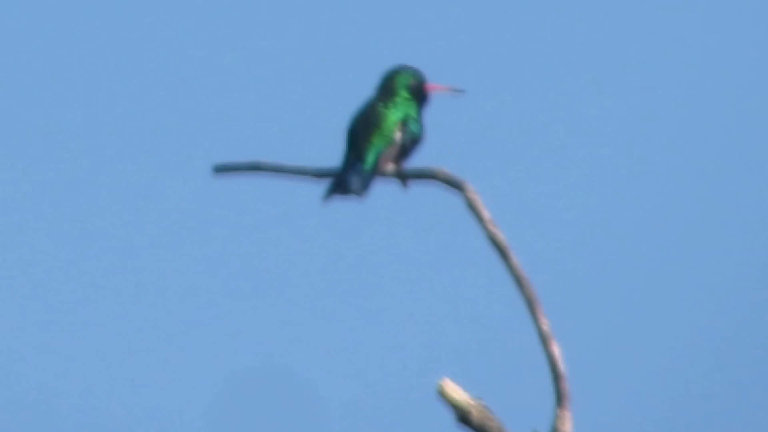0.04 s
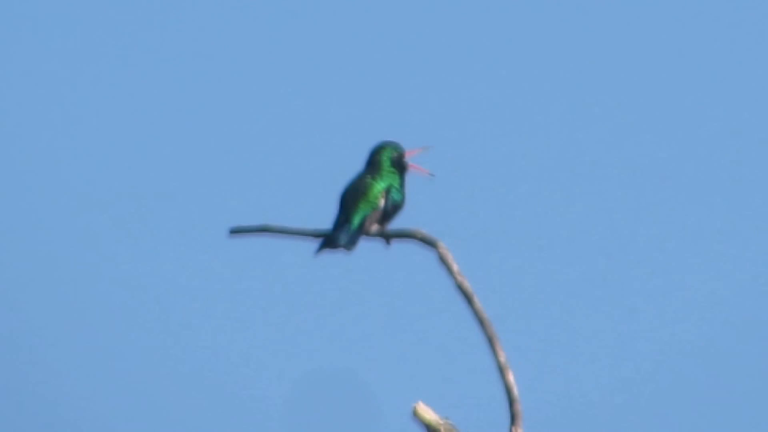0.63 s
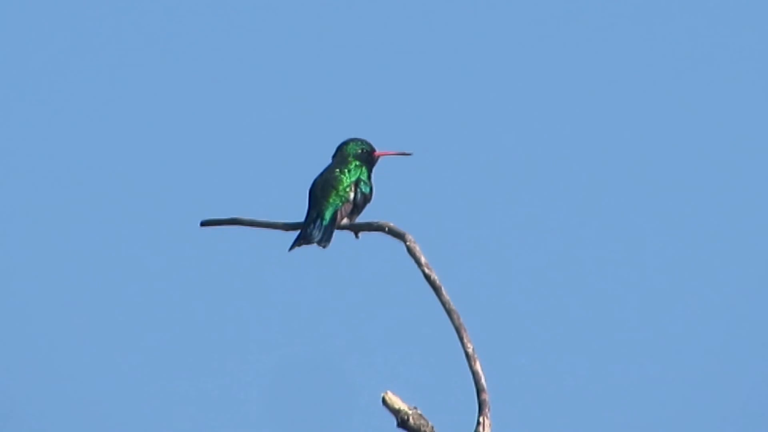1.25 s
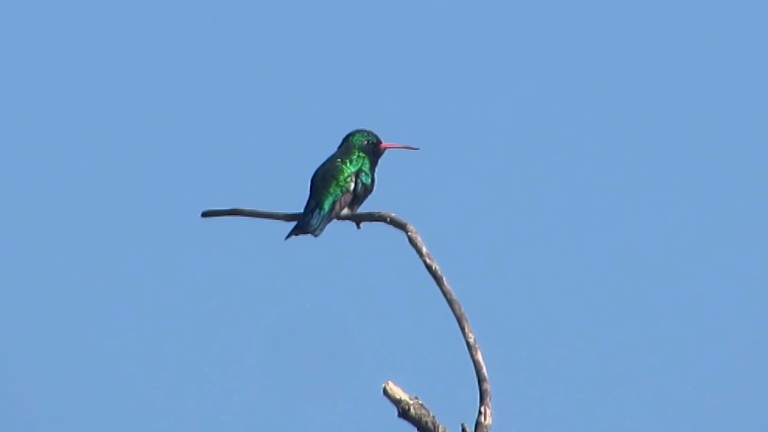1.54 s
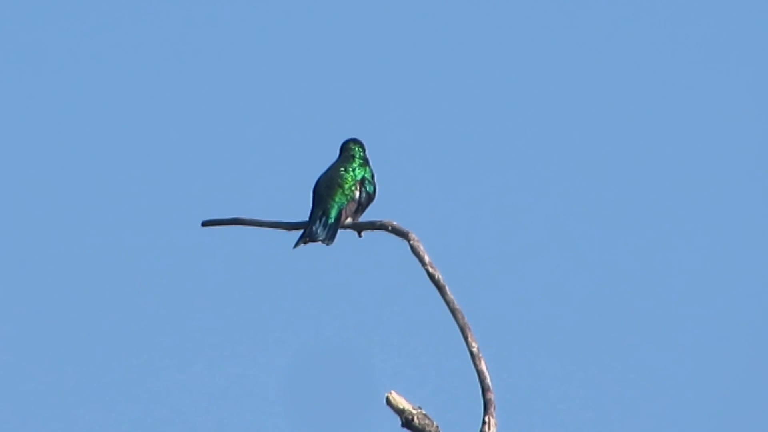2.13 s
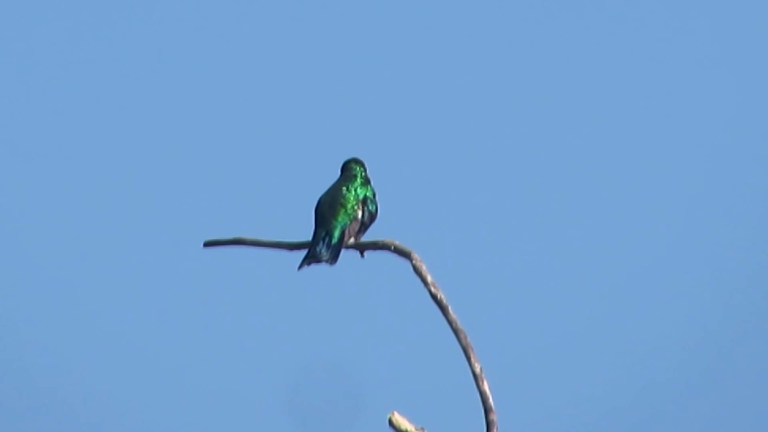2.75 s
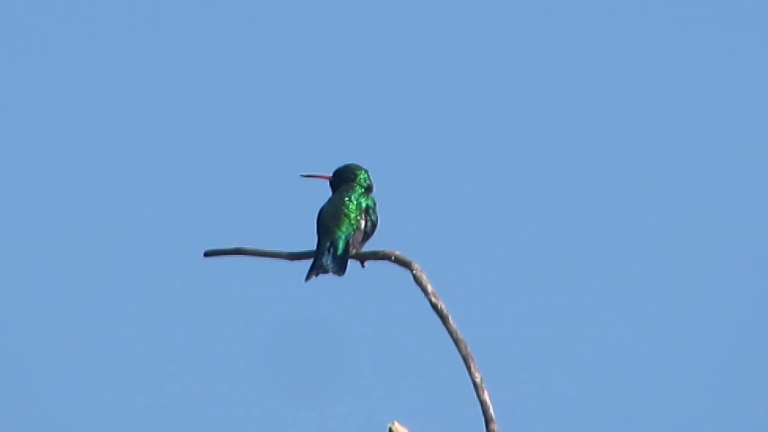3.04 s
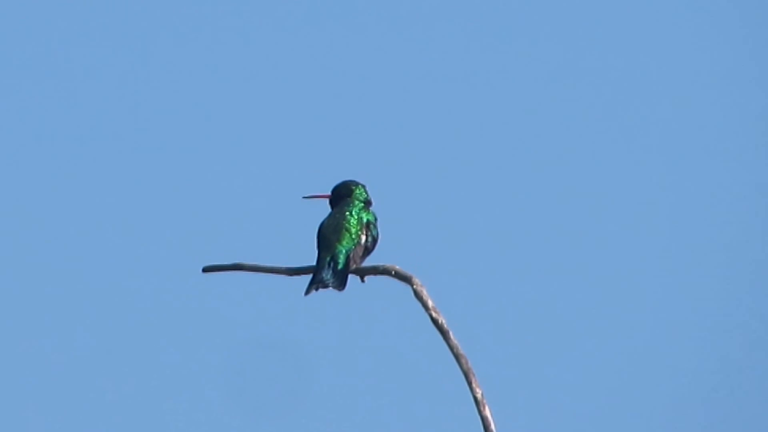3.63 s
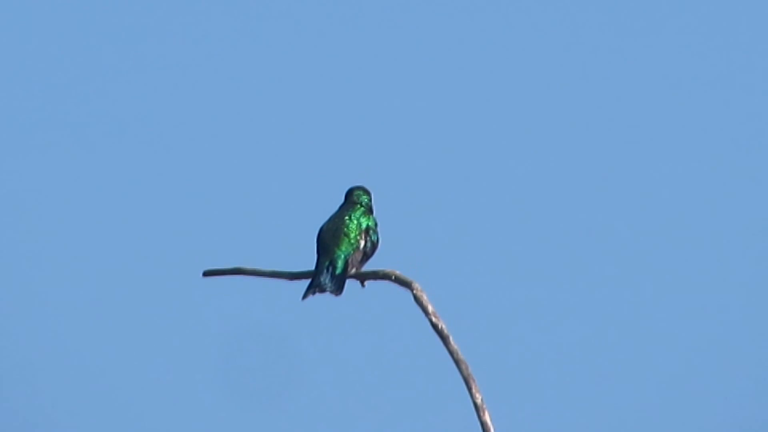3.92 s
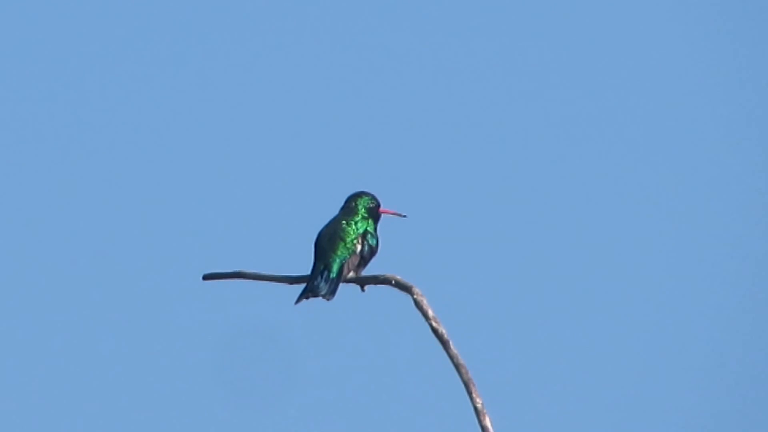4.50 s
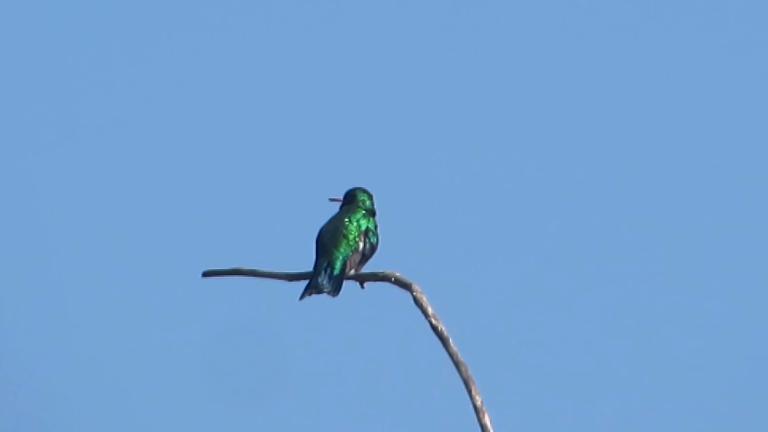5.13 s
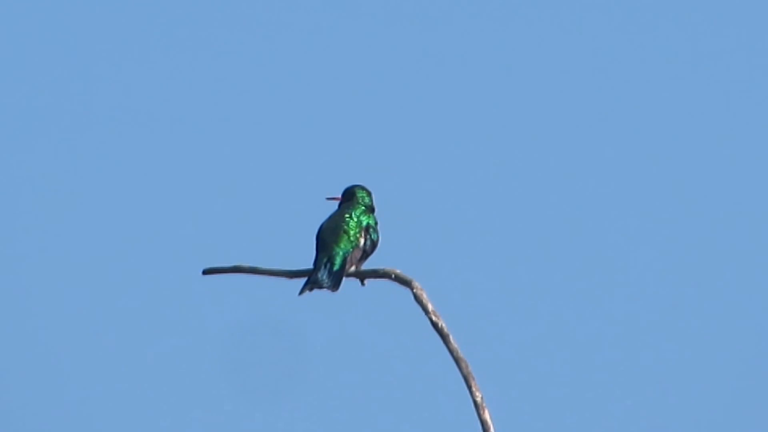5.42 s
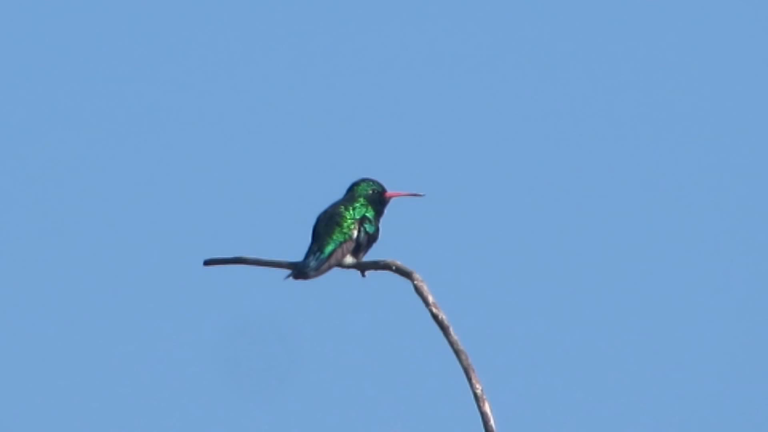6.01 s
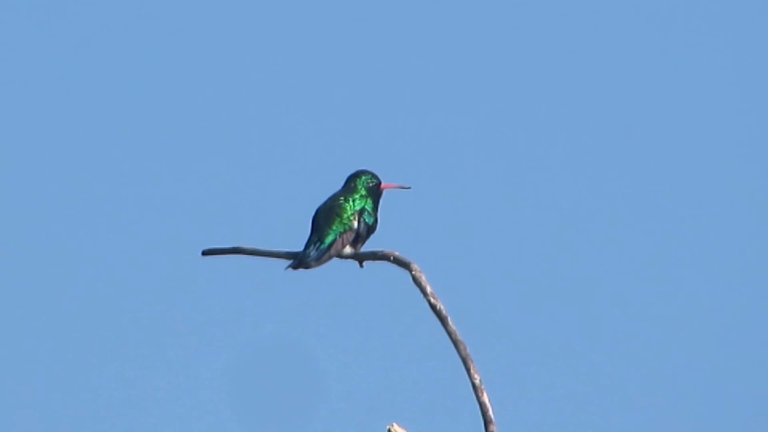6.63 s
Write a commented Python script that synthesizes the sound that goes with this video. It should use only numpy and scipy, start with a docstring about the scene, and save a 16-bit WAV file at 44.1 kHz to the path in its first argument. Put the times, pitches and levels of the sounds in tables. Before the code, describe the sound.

A close cricket chirps in quick runs while small birds slur, chatter and trill over distant insects, frogs and a light breeze.

```python
"""A breeze buffets a hand-held camera's microphone and a switch clicks on its case; then a near cricket
scrapes its wings in quick pairs of strokes. Open country by day: more crickets and far-off frogs
merge into choruses behind it. Off to the right, small birds slur, whistle and chatter, scattered
by leaves and trunks, and a dry trill swells in the second half. The hand bumps the case softly."""
import sys
import numpy as np
from scipy import signal
from scipy.fft import rfft, irfft
from scipy.io import wavfile

SR = 44100
rng = np.random.default_rng(int(sys.argv[2]) if len(sys.argv) > 2 else 0)


def generate_wav(sig):
    """Save sig (samples, or channels by samples) to the path in sys.argv[1] as 16-bit PCM at SR."""
    pcm = np.round(np.clip(np.atleast_2d(sig).T, -1, 1) * 32767).astype(np.int16)
    wavfile.write(sys.argv[1], SR, pcm)


N = 298116
T = np.arange(N) / SR
HZ = np.fft.rfftfreq(N, 1 / SR)


def amp(db):
    """Decibels to gain."""
    return 10 ** (np.asarray(db) / 20)


def unit_rms(x):
    """Scales to unit rms."""
    return x / np.sqrt(np.mean(x ** 2) + 1e-20)


def over_frequency(points):
    """The columns of a table, interpolated along the log-frequency axis."""
    hz, *columns = np.transpose(points)
    return [np.interp(np.log(HZ + 1), np.log(hz), column) for column in columns]


def add(mix, start_s, sound):
    """Mixes a sound in at its start time."""
    part = mix[max(round(start_s * SR), 0):][:len(sound)]
    part += sound[:len(part)]


def drift(rate_hz):
    """A smooth random wander of unit rms, mostly slower than rate_hz."""
    hz = HZ[:N // 16]
    real, imag = rng.standard_normal((2, len(hz)))
    return unit_rms(irfft((real + 1j * imag) * np.exp(-(hz / rate_hz) ** 2), N))


def pan(pan_db):
    """Left and right gains for a level difference, left minus right."""
    half_db = np.atleast_1d(pan_db) / 2
    return np.array([amp(half_db), amp(-half_db)])


def noise(density_db, correlation, pan_db):
    """Two partly alike channels of noise with a given power per Hz."""
    left, unrelated = rfft(rng.standard_normal((2, N)))
    right = correlation * left + np.sqrt(1 - correlation ** 2) * unrelated
    return irfft(np.array([left, right]) * pan(pan_db) * amp(density_db) * np.sqrt(SR / 2), N)


def resonance(hz, width_hz):
    """Frequency response of one resonance, gain 1 at its top."""
    return 1j * HZ * width_hz / (hz ** 2 - HZ ** 2 + 1j * HZ * width_hz)


def tone(hz):
    """A sine of unit rms that follows a pitch curve."""
    return np.sqrt(2) * np.sin(2 * np.pi * np.cumsum(hz) / SR)


def glide(length_s, start, middle, end, flatness=2):
    """A smooth pitch curve through three pitches."""
    u = np.linspace(-1, 1, round(length_s * SR))
    return middle + (end - start) / 2 * u + ((start + end) / 2 - middle) * abs(u) ** flatness


def sing(notes, waver, overtone_db, fade_db):
    """Nearly pure bird notes (start s, pitch curve, dB) that grow unsteady; a negative fade swells."""
    out, wobble = np.zeros(N), waver * drift(410)
    for s, pitch, db in notes:
        u = np.linspace(0, 1, len(pitch))
        hz = pitch * (1 + 2 * u * wobble.take(round(s * SR) + np.arange(len(u)), mode="wrap"))
        envelope = amp(db - fade_db * u) * np.sin(np.pi * u).clip(0) ** .5
        add(out, s, envelope * (tone(hz) + amp(overtone_db) * tone(2 * hz)))
    return out


def outdoors(call, pan_db, wet_db, t60):
    """Places a caller; leaves and trunks scatter a short tail after it."""
    t = T[:SR // 2]
    tail = rng.standard_normal((2, len(t))) * amp(-60 * t / t60) * (1 - np.exp(-t / .001))
    mid, side = signal.fftconvolve(call[None], tail / np.linalg.norm(tail[0]), axes=1)[:, :N]
    echo = 1.11 * mid + .5 * side * np.array([[1], [-1]])  # the close ports hear much the same
    return pan(pan_db) * (call + amp(wet_db) * echo)


def from_right(sound, lag_s=.00003):
    """Sound from the right reaches the microphone's left port a little later."""
    left, right = sound
    return np.array([irfft(rfft(left) * np.exp(-2j * np.pi * HZ * lag_s), N), right])


def still_air():
    """The distant wash of open country and the microphone's hiss, flickering slightly."""
    # Its spectrum. Each row: frequency in Hz, density in dB per Hz.
    spectrum = [(20, -67.5), (80, -64), (150, -71.5), (300, -77.5), (480, -78.5), (720, -77), (1000, -81),
                (1400, -87), (2000, -92.5), (3300, -91.5), (6400, -101), (7600, -100), (8600, -106),
                (12800, -111), (14800, -120)]
    # Its stereo spread. Each row: frequency in Hz, left-right correlation, left minus right in dB.
    spread = [(97.5, 0.4, -6), (250, -0.22, -2), (480, 0.11, 2.5), (1180, 0.41, 0.5), (3000, 0.084, -1.5),
              (6500, 0.032, 1), (7400, -0.33, 0), (14000, 0.59, 1)]
    return noise(over_frequency(spectrum)[0], *over_frequency(spread)) * amp(.86 * drift(23))


def far_band(hz, width_hz):
    """Many far calls merge into one narrow, surging band."""
    band_db = 40 * np.log10(abs(resonance(hz, 2 * width_hz)) + 1e-9)
    return unit_rms(noise(band_db, correlation=.84, pan_db=1.5) * amp(2.2 * drift(5.1)))


def frogs():
    """Far off, two lasting bands of frog chorus and a lower one in bouts."""
    # The lasting bands. Each row: centre in Hz, width in Hz, level in dB.
    bands = [(857.8, 32.7, -48.5), (592.6, 8.8, -61.5)]
    # Bouts of the low call. Each row: start and end in seconds, level in dB.
    low_calls = [(0.598, 1.946, -51.5), (3.23, 3.785, -51.5), (4.475, 5.08, -52.5), (5.684, 6.354, -55)]
    chorus = sum(amp(db) * far_band(hz, width) for hz, width, db in bands)
    bouts = sum(amp(db) * np.clip(np.minimum(T - start, end - T) / .1, 0, 1)
                for start, end, db in low_calls)
    return chorus + bouts * far_band(hz=430, width_hz=67)


def bush_cricket(hz=12600, width_hz=1700):
    """A faint, high sizzle that comes in late."""
    # Its swell. Each row: time in seconds, level in dB.
    swell = [(4.8, -100), (5.3, -74), (6.2, -75), (6.76, -73.5)]
    band = noise(-8 * ((HZ - hz) / width_hz) ** 2, correlation=.2, pan_db=-2)
    return unit_rms(band) * amp(np.interp(T, *np.transpose(swell)) + 1.5 * drift(120))


def twitter(faintest_db=-71, count=240):
    """Faint squeaks of far birds at random moments."""
    when, pitch, tilt, size = rng.random((count, 4)).T
    hz, slope = 2400 + 1200 * pitch, .302 * tilt - .2
    glides = map(glide, .00957 + .0223 * size, hz * (1 - slope), hz, hz * (1 + slope))
    notes = zip(when * T[-1], glides, faintest_db + 6 * size)
    voice = sing(notes, waver=.02, overtone_db=-36, fade_db=3.5)
    return outdoors(voice, pan_db=-6, wet_db=4, t60=.12)


def far_crickets():
    """Two farther crickets throb out of step in front of a blurred chorus."""
    # Their arched chirps. Each row: top pitch in Hz, arch depth in Hz, length in seconds, level in dB.
    chirps = [(4813, 353, 0.057, -47.5), (4523, 200, .030, -58.5)]
    # Their beats. Each row: middle of the first chirp and period, both in seconds.
    beats = [(.073, .0838), (.110, .0571)]
    # The chorus. Each row: frequency in Hz, density in dB per Hz.
    spectrum = [(3900, -115), (4200, -94), (4400, -80.5), (4550, -78.5), (4750, -80), (4950, -82),
                (5150, -86.5), (5400, -105), (5800, -97), (6400, -115)]
    out, wobble = np.zeros(N), 1 + .0025 * drift(160)
    for (hz, arch_hz, length, db), (first, period) in zip(chirps, beats):
        u = np.linspace(-1, 1, round(length * SR))
        for s in np.arange(first, T[-1], period):
            size, late = rng.standard_normal(2)
            pitch = (hz - arch_hz * u ** 2) * wobble.take(round(s * SR) + np.arange(len(u)), mode="wrap")
            chirp = amp(db + .85 * size) * tone(pitch) * np.sqrt(1 - u ** 2)
            add(out, s - length / 2 + .003 * late, chirp)
    chorus = noise(over_frequency(spectrum)[0], correlation=.92, pan_db=-3.5) * amp(2 * drift(48))
    return outdoors(out, pan_db=-4.5, wet_db=-14, t60=.15) + chorus


def breeze(buffet_s=.025, turbulence_db=3.5, turbulence_hz=17.5):
    """Turbulent wind pushes the microphone's two ports in opposite directions."""
    # The rumble before the gains below. Each row: frequency in Hz, density in dB per Hz.
    spectrum = [(10, -97), (30, -63), (48, -53.5), (85, -61), (140, -67.5), (220, -79.5), (450, -100),
                (1200, -140)]
    # Spells of breeze. Each row: time in seconds, gain in dB.
    spells = [(0, 2.5), (.2, 0), (.33, -12), (1.4, -9.5), (1.6, 0.5), (2.25, 9), (2.6, 5.5), (3.0, -15),
              (3.4, -17), (3.6, -4), (5.55, -20), (5.72, -2.5), (6.4, 0.5), (6.75, -11)]
    # Single buffets that stand out of it. Each row: time of the peak in seconds, gain in dB.
    buffets = [(.05, 12.5), (.16, 8.5), (.79, 12.5), (1.6, 11.5), (1.97, 10), (5.71, 11), (6.39, 12)]
    strength = amp(np.interp(T, *np.transpose(spells)) + turbulence_db * drift(turbulence_hz))
    gusts = sum(amp(db) * np.exp(-((T - s) / buffet_s) ** 2) for s, db in buffets)
    rumble = noise(over_frequency(spectrum)[0], correlation=-.93, pan_db=-5.4)
    return rumble * np.hypot(strength, gusts)


def handling(scrape_db=-21, bump_rise_s=.00077):
    """Right at the microphone, the hand bumps the case and a switch rings it with snaps and scrapes."""
    # Soft bumps. Each row: start in seconds, level in dB, ring in Hz.
    touches = [(1.45, -25, 265), (1.984, -31, 220), (2.233, -29.5, 232), (2.408, -28, 218),
               (2.812, -30, 280), (3.31, -27.5, 273), (3.535, -27, 250), (3.631, -31, 220),
               (3.772, -32, 217), (3.878, -27.5, 230), (5.498, -26.5, 230), (5.758, -24.5, 257)]
    # The switch slides and snaps. Each row: start in seconds, level in dB, scrape decay in seconds.
    snaps = [(0.172, -33, 0.0022), (0.182, -29, 0.0062), (.189, -29, 0.013), (0.2012, -17.5, 0.00048),
             (0.2036, -29.5, 0.01), (.209, -28, 0.0025)]
    # Resonances of the case. Each row: centre in Hz, width in Hz, relative level in dB.
    modes = [(840, 340, 3.5), (1340, 310, 1), (1740, 37, 12), (2350, 170, -31)]
    bumps, clicks, t = np.zeros(N), np.zeros(N), T[:SR // 16]
    rise = t / bump_rise_s
    for s, db, hz in touches:
        add(bumps, s, amp(db) * rise * np.exp(1 - rise) * np.cos(2 * np.pi * hz * t))
    for s, db, decay in snaps:
        scrape = amp(scrape_db) * rng.standard_normal(len(t)) * np.exp(-t / decay)
        add(clicks, s, amp(db) * ((t == 0) + scrape))
    ring = sum(amp(db) * resonance(hz, width) for hz, width, db in modes)
    case = unit_rms(ring / (1 + 1j * HZ / 6000))
    return pan(9.8) * bumps + pan(6.8) * irfft(rfft(clicks) * case, N)


def whistles():
    """A farther bird's thin, steady arches."""
    # Each row: start and length in seconds, first, middle and last pitch in Hz,
    # flatness of the top (2 is round), level in dB.
    arches = [(0.156, .14, 3680, 3620, 2950, 1.7, -58), (.625, 0.087, 3250, 3370, 3080, 2.4, -59.5),
              (1.223, .118, 3470, 3610, 3230, 2.03, -52.5), (4.138, .135, 3000, 3920, 3000, 3.7, -49)]
    notes = [(s, glide(*shape), db) for s, *shape, db in arches]
    voice = sing(notes, waver=.003, overtone_db=-37, fade_db=-3.5)
    return outdoors(voice, pan_db=-7, wet_db=-7.5, t60=.14)


def chatter(length_s=.16, hold_s=.028, hold_hz=1190, swell_db=3, fade_db=3, rasp_db=-36):
    """A bird holds a low note, then flicks up and down; its throat picks out harmonics, and it rasps."""
    # Each row: start in seconds, level in dB, pitch factor, throat resonance and its width in Hz.
    calls = [(0.409, -48, 0.98, 2950, 2400), (1.951, -57.5, 0.98, 3000, 2300),
             (2.320, -59.5, 0.89, 2730, 2300), (2.713, -38.5, 0.97, 3440, 2740),
             (3.558, -45.5, 0.93, 2790, 2680), (4.104, -60, 0.9, 2430, 2300)]
    flick_s, low_hz, high_hz = .0187, 1600, 2583  # all pitches are before each call's factor
    lean = .55  # makes the rise quicker than the slide back
    out, t = np.zeros(N), T[:round(length_s * SR)]
    u = t / t[-1]
    effort = amp(swell_db * np.sin(np.pi * u) - fade_db * u) * signal.windows.tukey(len(t), .2)
    slip, wander = .2 * drift(40), .085 * drift(70)  # uneven timing and pitch of the flicks
    jitter, rasp = .025 * drift(250), rng.standard_normal(N)
    for s, db, factor, throat, width in calls:
        now = round(s * SR) + np.arange(len(t))
        turn = 2 * np.pi * ((t - hold_s) / flick_s + slip[now])
        register = .5 - .5 * np.tanh(2 * np.cos(turn + lean * (1 - np.cos(turn))))
        flicks = (low_hz + (high_hz - low_hz) * register) * (1 + wander[now])
        pitch = factor * np.where(t < hold_s, hold_hz, flicks) * (1 + jitter[now])
        harmonics = [k * pitch for k in range(1, 7)]
        voice = sum(tone(hz) / (1 + ((hz - throat ** 2 / hz) / width) ** 2) ** 1.42 for hz in harmonics)
        roughness = amp(rasp_db) * unit_rms(rasp[now] * effort ** 3)
        add(out, s, amp(db) * (unit_rms(voice * effort) + roughness))
    return outdoors(out, pan_db=-3, wet_db=-7, t60=.15)


def trill(start_s=4.3063, note_s=.025, arch=.073, gap_count=36):
    """Dry, arched notes with a strong second harmonic, repeated ever more slowly."""
    # Its course. Each row: time in seconds, level in dB, top of the fundamental in Hz.
    course = [(4.3, -62, 1784), (4.7, -55.5, 1850), (5.6, -51.5, 1906), (6.0, -50, 1948), (6.75, -46, 1896)]
    first_gap_s, limit_gap_s, slowing_notes = .0601, .0748, 20.1
    times, levels, pitches = np.transpose(course)
    out, u = np.zeros(N), np.linspace(-1, 1, round(note_s * SR))
    gaps = limit_gap_s + (first_gap_s - limit_gap_s) * np.exp(-np.arange(gap_count) / slowing_notes)
    for s in np.cumsum([start_s, *gaps]):
        hz = np.interp(s, times, pitches) * (1 - arch * (u + .15) ** 2)
        note = amp(-10) * tone(hz) + tone(2 * hz) + amp(-10.5) * tone(3 * hz) + amp(-24) * tone(4 * hz)
        add(out, s - note_s / 2, amp(np.interp(s, times, levels)) * note * (1 - u ** 2))
    return outdoors(out, pan_db=-4, wet_db=-10, t60=.2)


def song(bow_hz=280, hook_s=.038, pip_s=.014):
    """A bird sings two-voiced rising notes, then pips with hooks that climb, turn and drop."""
    # Opening notes. Each row: start and length in seconds, first and last pitch in Hz, level in dB.
    rises = [(2.414, .052, 3980, 5780, -37), (2.57, .056, 3730, 5600, -36),
             (2.742, .033, 3950, 5050, -34.5), (2.878, 0.043, 2980, 4440, -37.5)]
    # Closing hooks. Each row: start in seconds, top pitch in Hz, level in dB.
    hooks = [(2.997, 2717, -43), (3.142, 2670, -44), (3.288, 2740, -44), (3.455, 2390, -52)]
    notes = []
    for s, length, start, end, db in rises:
        shape = np.array([start, (start + end) / 2 + bow_hz, end])  # quick at first, then flatter
        notes.append((s, glide(length, *shape), db))
        notes.append((s + .009, glide(.02, *shape * .85), db - 13))  # second voice: lower and faster
    hook = np.interp(np.linspace(0, 1, round(hook_s * SR)), [0, .676, 1], [.82, 1, .78])
    for s, hz, db in hooks:
        notes.append((s - .007, np.full(round(pip_s * SR), hz * 1.18), db - 2))  # a higher pip leads
        notes.append((s, hz * hook, db))
    voice = sing(notes, waver=.0098, overtone_db=-41, fade_db=-1)
    return outdoors(voice, pan_db=-5, wet_db=-7, t60=.13)


def slurs(length_s=.14, rest_hz=2178):
    """Bird calls from the trees drop fast towards one low pitch; they arrive half scattered."""
    # Each row: start in seconds, first pitch in Hz, time constant of the fall in seconds, level in dB.
    calls = [(1.702, 5690, 0.06, -38.5), (2.175, 6190, 0.081, -34), (3.729, 5850, 0.064, -34),
             (6.175, 6080, .057, -33.5), (6.728, 6270, 0.077, -29.5)]
    t = T[:round(length_s * SR)]
    notes = [(s, rest_hz + (hz - rest_hz) * np.exp(-t / fall), db) for s, hz, fall, db in calls]
    voice = sing(notes, waver=.045, overtone_db=-48, fade_db=32)
    return outdoors(voice, pan_db=-4.5, wet_db=3, t60=.13)


def wing_stroke(length_s, hz, sag_hz):
    """The scraper runs along the file; the wing's note sags as it slows."""
    u = np.linspace(0, 1, round(length_s * SR))
    return tone(hz - sag_hz * u ** 3) * np.sin(np.pi * u)


def near_cricket(chirp_gap_s=.06):
    """A cricket near the microphone; each chirp is a short wing stroke and a longer one."""
    # Even runs of chirps. Each row: first and last chirp in seconds, level in dB.
    runs = [(0.625, 1.176, -43.5), (1.71, 2.488, -42), (2.894, 3.495, -42), (4.006, 4.714, -41.5),
            (4.772, 5.26, -42), (5.775, 6.015, -41.5), (6.072, 6.723, -41.5)]
    out = np.zeros(N)
    for first, last, db in runs:
        for s in np.linspace(first, last, round((last - first) / chirp_gap_s) + 1):
            size, tune = rng.standard_normal(2)
            short = wing_stroke(.015, hz=5148 + 12 * tune, sag_hz=170)
            long = wing_stroke(.019, hz=5150 + 12 * tune, sag_hz=110)
            add(out, s - .0075, amp(db + .55 * size) * short)
            add(out, s + .0115 + .0002 * size, amp(db + .3 * size) * long)
    return outdoors(out, pan_db=-4.5, wet_db=-17, t60=.12)


def scene():
    """Insects and birds off to the right of the microphone, frogs and wind all round."""
    crickets = near_cricket() + far_crickets()
    birds = slurs() + song() + whistles() + twitter() + chatter() + trill()
    return from_right(crickets + birds) + bush_cricket() + frogs() + handling() + breeze() + still_air()


def record(dry):
    """The camera's notches, its start from silence and its band limit."""
    # Narrow notches. Each row: centre in Hz, width in Hz, gain at the centre in dB.
    notches = [(3950, 117, -12.5), (7930, 120, -20)]
    colour_db = sum(depth * np.exp(-((HZ - hz) / width) ** 2) for hz, width, depth in notches)
    opening = np.clip((T - .035) / .00022, 0, 1)
    sound = irfft(rfft(dry) * amp(colour_db), N) * opening
    lowpass = signal.firwin(511, cutoff=14700, window=("kaiser", 9), fs=SR)
    return signal.oaconvolve(sound, lowpass[None], "same")


dry = scene()
out = record(dry)
generate_wav(out)
```